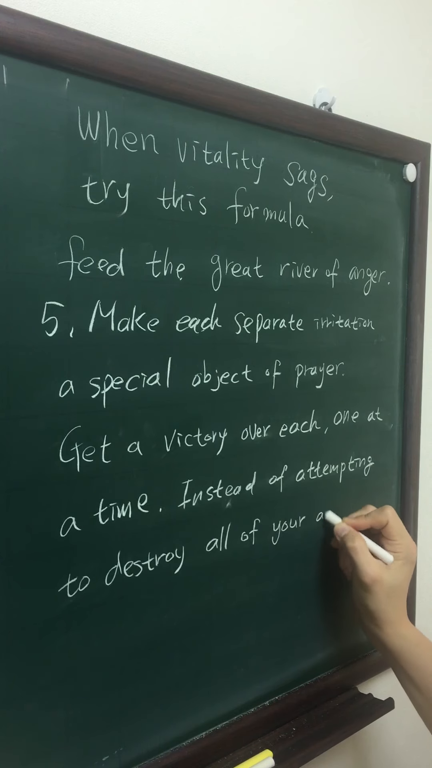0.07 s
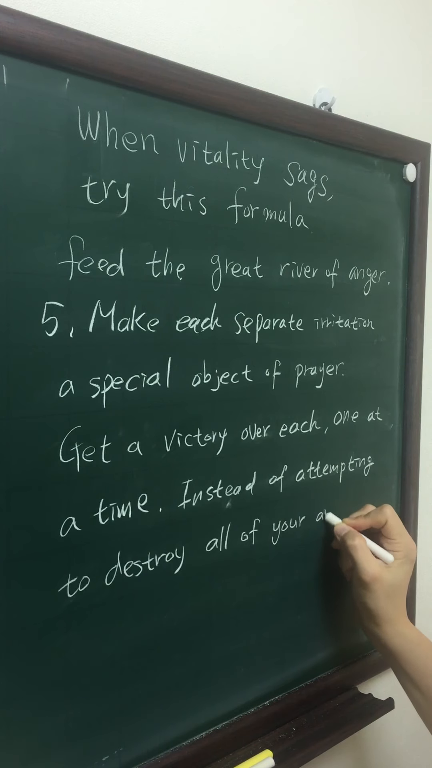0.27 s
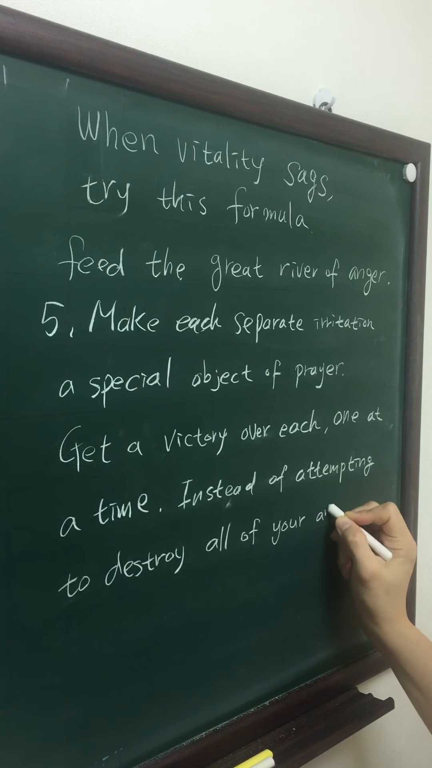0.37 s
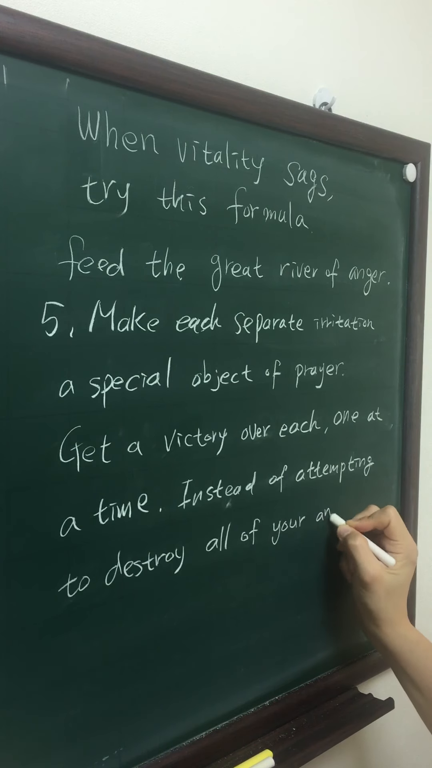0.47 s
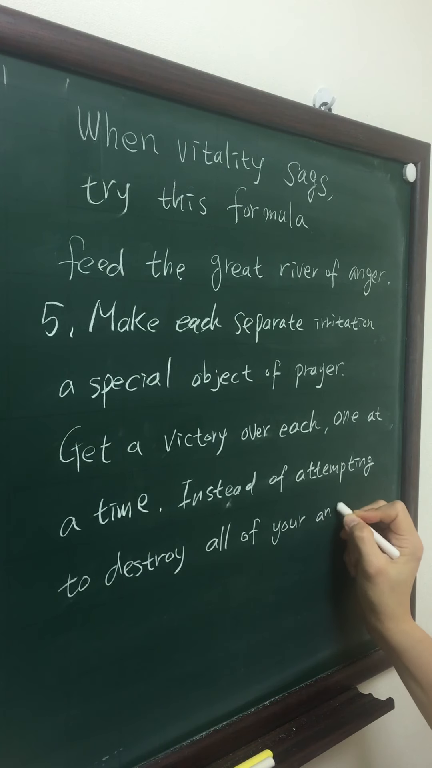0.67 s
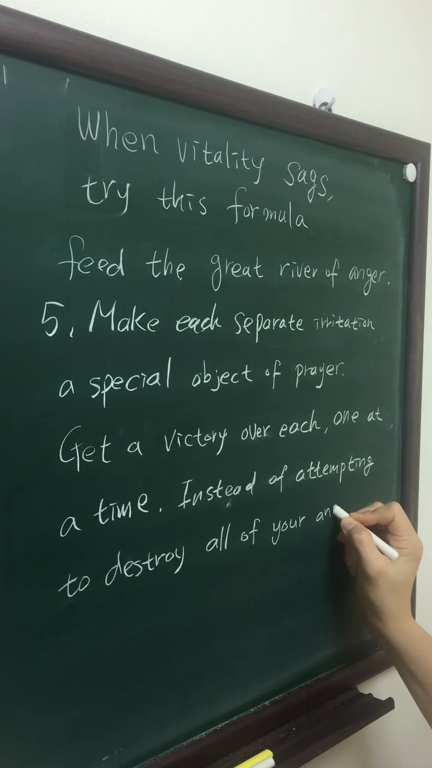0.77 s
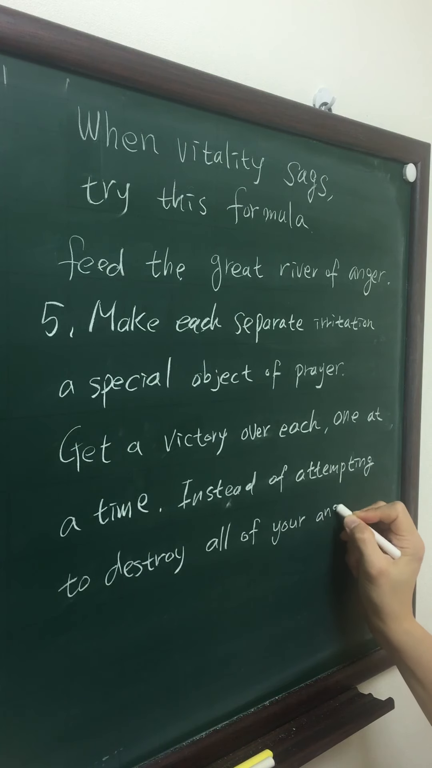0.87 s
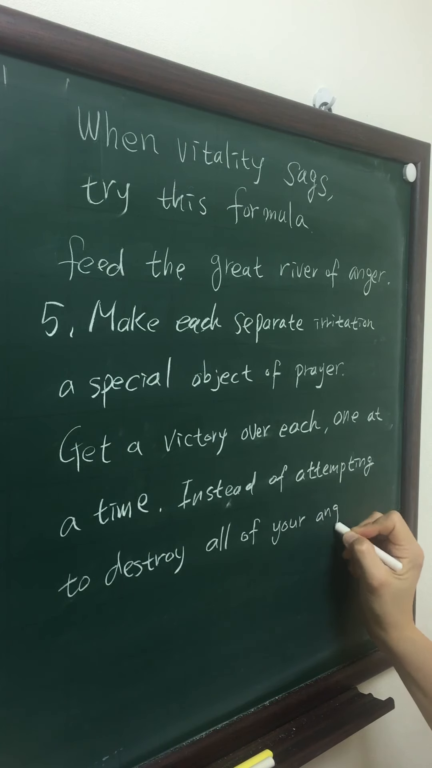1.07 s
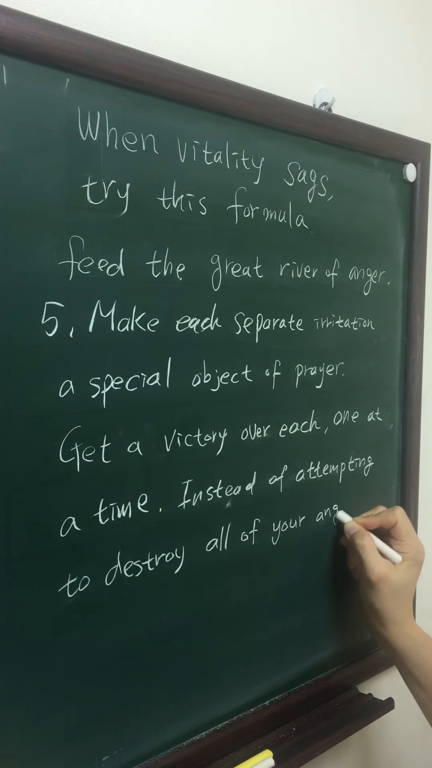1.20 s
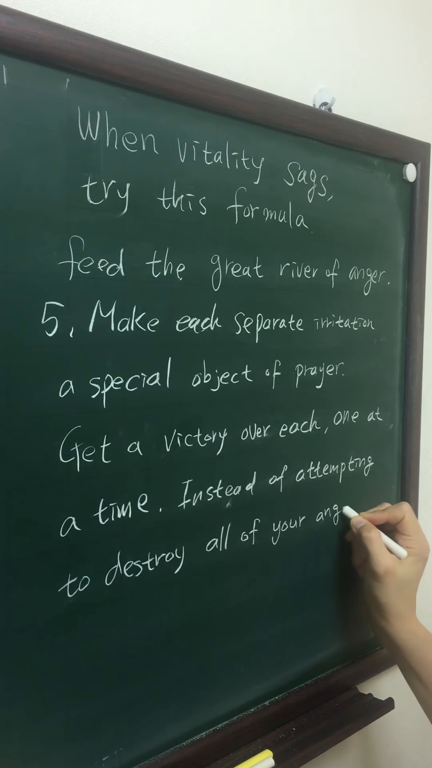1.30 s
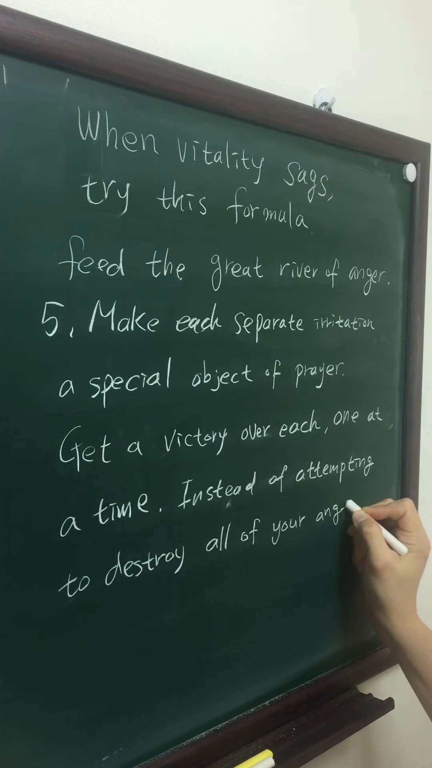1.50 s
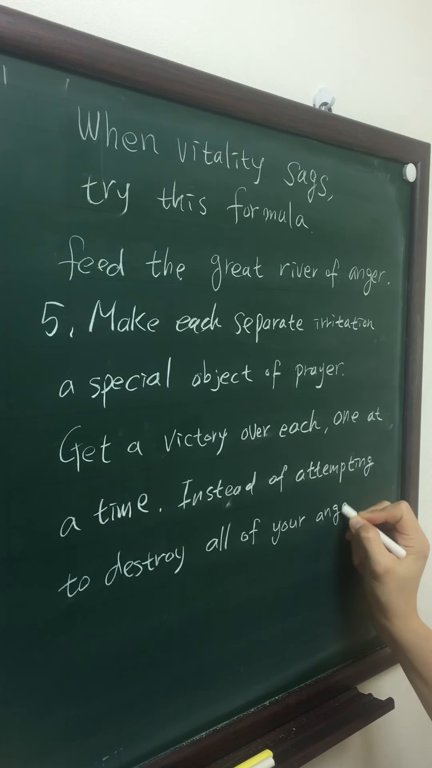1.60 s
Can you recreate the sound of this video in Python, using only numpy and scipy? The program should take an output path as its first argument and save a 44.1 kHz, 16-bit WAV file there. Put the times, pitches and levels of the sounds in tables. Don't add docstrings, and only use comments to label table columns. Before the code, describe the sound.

Chalk writing on a chalkboard, two hollow knocks and quick dry scratchy strokes in a quiet room

```python
import sys
import numpy as np
from scipy import signal
from scipy.fft import rfft, irfft
from scipy.io import wavfile
from scipy.ndimage import uniform_filter1d

SR = 44100
rng = np.random.default_rng(int(sys.argv[2]) if len(sys.argv) > 2 else 0)


def level_to_linear(level):
    exponent = np.asarray(level, float) / 20
    return 10 ** exponent


def inscribe(sig):
    pcm = np.round(np.clip(np.atleast_2d(sig).T, -1, 1) * 32767)
    wavfile.write(sys.argv[1], SR, pcm.astype(np.int16))


N = 72765


def rms_one(x):
    return x / np.sqrt(np.mean(x ** 2) + 1e-20)


def ring(clicks, hz, t60):
    r, w = level_to_linear(-60 / (t60 * SR)), 2 * np.pi * hz / SR
    return signal.lfilter([0, np.sin(w)], [1, -2 * r * np.cos(w), r * r], clicks + 1e-18)


def resonate(x, hz, width_hz):
    r = np.exp(-np.pi * width_hz / SR)
    poles = [1, -2 * r * np.cos(2 * np.pi * hz / SR), r * r]
    return signal.lfilter([(1 - r * r) / 2, 0, (r * r - 1) / 2], poles, x)


def band(x, hz, width_hz):
    return rms_one(resonate(resonate(x, hz, width_hz), hz, 2 * width_hz))


def bank(x, rows):
    out = 0
    for k, (hz, width_hz, db) in enumerate(rows):
        out = out + (-1) ** k * level_to_linear(db) * resonate(x, hz, width_hz)
    return rms_one(out)


def butter(x, order, hz, kind="low"):
    return signal.sosfilt(signal.butter(order, hz, kind, fs=SR, output="sos"), x)


# (frequency [Hz], level [dB])
AIR_COLOUR = [(24, -44), (40, -9.5), (93, 0), (359, 0), (548, -2), (1380, -9.5), (1860, -10), (2510, -15),
              (15500, -14)]
AIR_DB = -68
HUM_HZ, HUM_WIDTH_HZ, HUM_DB = 182, 50, -79.5


def floor():
    hz = np.maximum(np.fft.rfftfreq(N, 1 / SR), 20)
    points = np.array(AIR_COLOUR)
    shape = level_to_linear(np.interp(np.log(hz), np.log(points[:, 0]), points[:, 1]))
    air = rms_one(irfft(rfft(rng.standard_normal(N)) * shape, N))
    hum = band(rng.standard_normal(N), HUM_HZ, HUM_WIDTH_HZ)
    return level_to_linear(AIR_DB) * air + level_to_linear(HUM_DB) * hum


GRAINS_PER_S, GRAIN_SPREAD_DB, FLICKER_DB = 9000, 2, -0.5


def grains():
    sizes = level_to_linear(GRAIN_SPREAD_DB * np.minimum(rng.exponential(1, N), 5)) * rng.choice([-1, 1], N)
    flicker = rms_one(uniform_filter1d(rng.standard_normal(N), size=400))
    breaks = rng.random(N) < GRAINS_PER_S / SR
    return rms_one(sizes * breaks * level_to_linear(FLICKER_DB * flicker))


def swell(middle, half):
    distance = np.abs((np.arange(N) / SR - middle) / half)
    return level_to_linear(-np.minimum(6 * distance ** 2.5, 200))


# (middle [s], half length [s], level [dB], chatter centre [Hz], low thud share [dB])
DRAGS = [
    (0.047, .05, -76, 1380, -0.5),
    (0.417, 0.053, -57, 1420, -11),
    (0.81, 0.054, -51, 1600, 0),
    (0.974, 0.031, -60.5, 1600, -5),
    (1.125, 0.081, -74.5, 1400, -3),
    (1.244, 0.039, -49.5, 1750, -11),
    (1.353, 0.035, -56.5, 1330, -7.5),
    (1.628, 0.057, -59.5, 1960, -21),
]
# (frequency [Hz], level [dB], t60 [s])
PANEL = [(332.4, -15.5, 0.3), (356.7, -4, 0.35), (444.7, -6, 0.18), (535, -21, .24), (617.3, -14.5, 0.092),
         (771.8, -2, 0.17), (1035, -17.5, .15), (1176, 1, 0.088), (1311, -3, 0.2), (1489, -11.5, 0.21),
         (1600, -14.5, 0.33), (1721, -15, 0.31), (2026, -12.5, .1), (2285, -14, .1)]
CHATTER_WIDTH_HZ = 650
EDGE_HZ, EDGE_WIDTH_HZ, EDGE_DB = 2600, 980, -7


def drags():
    grit, body, out = grains(), 0, 0
    for k, (hz, db, _) in enumerate(PANEL):
        body = body + (-1) ** k * level_to_linear(0.25 * db) * resonate(grit, hz, 30 + 0.017 * hz)
    thud = rms_one(resonate(resonate(body, 420, 220), 400, 260))
    upper = butter(body, 4, 950, "high")
    edge = level_to_linear(EDGE_DB) * band(grains(), EDGE_HZ, EDGE_WIDTH_HZ)
    for middle, half, db, hz, thud_db in DRAGS:
        chatter = rms_one(rms_one(resonate(upper, hz, CHATTER_WIDTH_HZ)) + edge)
        out = out + level_to_linear(db) * swell(middle, half) * (chatter + level_to_linear(thud_db) * thud)
    return out


# (middle [s], half length [s], hiss level [dB], stick ring level [dB], brightest hiss [Hz])
STROKES = [(0.049, 0.043, -57.5, -60.5, 10900), (.262, 0.031, -65, -63, 7500),
           (0.305, 0.029, -53, -62.5, 13000), (0.422, .028, -51.5, -63.5, 11100),
           (0.533, 0.046, -56, -62.5, 10000), (0.746, 0.015, -65.5, -53, 7090),
           (0.824, 0.044, -50.5, -56.5, 13700), (0.933, 0.036, -59, -62, 7650),
           (1.032, 0.026, -65, -68, 12000), (1.104, 0.035, -49.5, -55.5, 10650),
           (1.231, 0.051, -62, -80, 10450), (1.322, 0.036, -50, -59, 9440), (1.362, 0.018, -55, -62, 10970),
           (1.444, 0.007, -66, -76.5, 9700), (1.493, 0.013, -67.5, -70, 11000),
           (1.553, 0.048, -59.5, -61.5, 11000), (1.645, 0.032, -64.5, -68, 11200)]
# (frequency [Hz], width [Hz], level [dB])
STICK_BEND = [(3013, 250, 1), (3633, 210, 4)]
# (frequency [Hz], width [Hz], level [dB])
STICK_HIGH = [(6260, 4300, 1), (7780, 1300, 7.5), (9070, 850, 5.5), (12000, 3100, 5), (14500, 2800, 2)]
BRIGHT_DB, BRIGHT_WIDTH_HZ = -1, 2200


def strokes():
    grit, finer, out = grains(), grains(), 0
    bend = bank(resonate(resonate(grit, 3400, 1100), 3400, 1300), STICK_BEND)
    high = bank(grit, STICK_HIGH)
    for middle, half, hiss_db, ring_db, hz in STROKES:
        bright = band(finer, hz, BRIGHT_WIDTH_HZ)
        hiss = rms_one(high + level_to_linear(BRIGHT_DB) * bright)
        out = out + swell(middle, half) * (level_to_linear(hiss_db) * hiss + level_to_linear(ring_db) * bend)
    return out


# (time [s], strength [dB], contact cut-off [Hz], stick tick level [dB], frame thump level [dB])
TAPS = [
    (.2214, -12, 2770, -23, -39.5),
    (0.728, -14, 2040, -30, -40),
    (1.4361, -28.5, 1570, -72, -79),
]
MODE_SPREAD_DB = 1.2


def struck(modes, column, soft, turn_hz=0):
    out = np.zeros(N)
    for tap in TAPS:
        click = np.zeros(N)
        click[int(tap[0] * SR)] = level_to_linear(tap[column])
        order, cut_hz = (5, tap[2]) if soft else (1, 3.4 * tap[2])
        click = butter(click, order, cut_hz)
        for k, (hz, db, t60) in enumerate(modes):
            side = np.sign(hz - turn_hz) if turn_hz else (-1) ** k
            rung = ring(click, hz, min(t60, 0.09 + 70 / hz))
            if turn_hz:
                rung = ring(rung, hz, t60) * 2 * np.e * np.log(1000) / (t60 * SR)
            out += side * level_to_linear(db + MODE_SPREAD_DB * rng.standard_normal()) * rung
    return out


# (frequency [Hz], level [dB], t60 [s])
KNOCK = [(356, -4, 0.02), (446.6, -1.5, 0.014), (1113, -5, 0.0067), (1501, -5.5, 0.0064)]


def knock():
    return struck(KNOCK, column=1, soft=True, turn_hz=700)


# (frequency [Hz], level [dB], t60 [s])
TICK = [(2156, -2, 0.0075), (2524, -2, 0.012), (3085, 6.5, 0.0024), (3685, 0, 0.0099), (4310, -1.5, 0.0041),
        (5550, -6.5, 0.0034), (13000, -12.5, .002)]


def tick():
    return struck(TICK, column=3, soft=False)


CRUMBLE_DB, CRUMBLE_T60_S, CRUMBLE_HZ, CRUMBLE_WIDTH_HZ = -16.5, 0.047, 4500, 6000


def crumble():
    t, fading = np.arange(N) / SR, 0
    for tap in TAPS:
        since = t - tap[0]
        fading = fading + (since > 0) * level_to_linear(tap[3] + CRUMBLE_DB - 60 * np.maximum(since, 0) / CRUMBLE_T60_S)
    grit = resonate(grains(), CRUMBLE_HZ, CRUMBLE_WIDTH_HZ)
    return fading * rms_one(resonate(grit, CRUMBLE_HZ, CRUMBLE_WIDTH_HZ))


def panel_ring():
    return level_to_linear(-13.5) * struck(PANEL, column=1, soft=True)


# (frequency [Hz], level [dB], t60 [s])
THUMP = [(45, -13, .35), (62, -12, 0.1), (110.3, -7.5, 0.2), (180, 2.5, 0.13)]


def thump():
    return struck(THUMP, column=4, soft=True)


# (middle [s], half length [s], level [dB], frequency [Hz], width [Hz])
SQUEALS = [(0.263, 0.039, -59.5, 6200, 2530), (0.274, 0.019, -57, 13300, 1500),
           (0.432, 0.018, -59, 6760, 700), (0.821, 0.064, -60, 7133, 558.5), (0.98, 0.042, -86, 7140, 700),
           (1.237, 0.03, -59, 11570, 904), (1.243, 0.015, -57, 8630, 794), (1.288, 0.074, -66.5, 5650, 596),
           (1.326, 0.026, -58.5, 9040, 700), (1.336, 0.051, -63, 2620, 510),
           (1.344, 0.025, -66, 11600, 1200)]


def squeals():
    grit, out = grains(), 0
    for middle, half, db, hz, width_hz in SQUEALS:
        out = out + level_to_linear(db) * swell(middle, half) * band(grit, hz, width_hz)
    return out


ROOM_T60_S, ROOM_HIGH_T60_S, ROOM_HIGH_DB = 0.22, 0.21, -1
WALL_S, NEAR_DB, ECHO_DB = 0.0095, -15, 6.5


def room(x):
    t = np.arange(SR // 2) / SR
    low = butter(rng.standard_normal(len(t)), 2, 2500)
    high = butter(rng.standard_normal(len(t)), 2, 2500, "high")
    tail = low * level_to_linear(-60 * t / ROOM_T60_S) + high * level_to_linear(ROOM_HIGH_DB - 60 * t / ROOM_HIGH_T60_S)
    tail = tail * np.where(t < WALL_S, level_to_linear(NEAR_DB) * (t > 0.001), 1)
    tail[int(WALL_S * SR) + 30] += level_to_linear(ECHO_DB)
    return signal.fftconvolve(x, 0.059 * tail)[:N]


RADIATES_ABOVE_HZ = 393
ROOM_DB, ROOM_STROKE_DB = -4.5, -11


def scene():
    air = floor()
    writing = drags() + strokes() + squeals()
    landing = butter(knock() + tick() + crumble(), 2, RADIATES_ABOVE_HZ, "high")
    panel = butter(panel_ring(), 2, RADIATES_ABOVE_HZ, "high") + thump()
    wet = room(level_to_linear(ROOM_DB) * landing + level_to_linear(ROOM_STROKE_DB) * writing)
    return (landing + panel + writing + wet + air)[None]


def top_cut(x):
    return signal.sosfilt(signal.butter(12, 16340, fs=SR, output="sos"), x)


def record(dry):
    x = butter(dry, 2, 85, "high")
    x = signal.sosfilt(signal.ellip(10, 0.5, 60, 15330, fs=SR, output="sos"), x)
    return top_cut(x)


dry = scene()
out = record(dry)
inscribe(out)
```